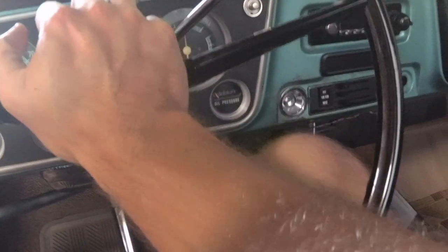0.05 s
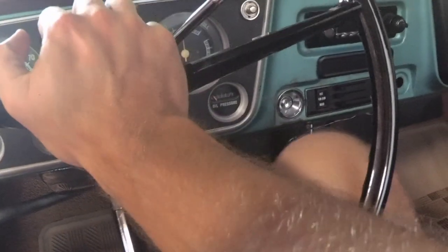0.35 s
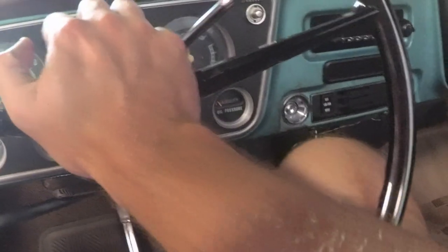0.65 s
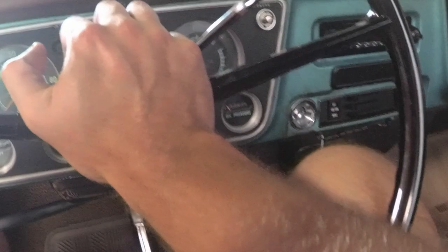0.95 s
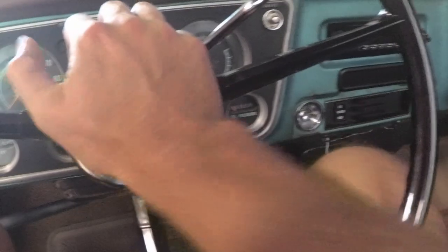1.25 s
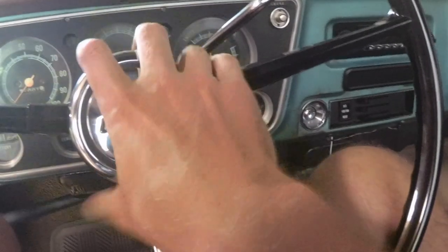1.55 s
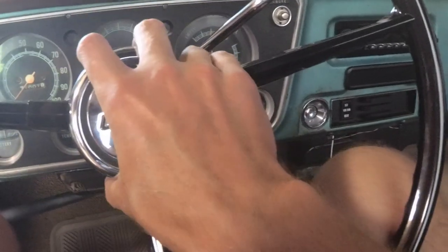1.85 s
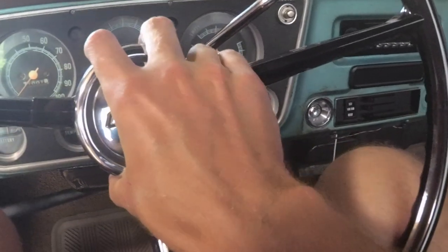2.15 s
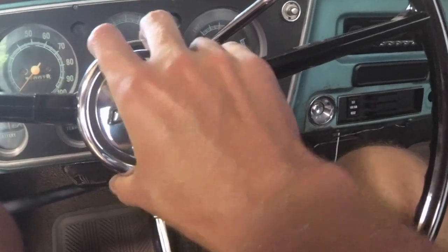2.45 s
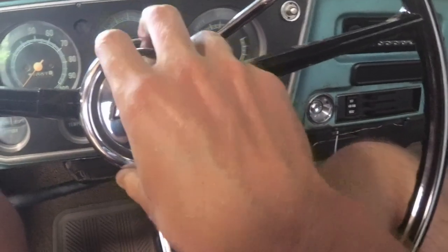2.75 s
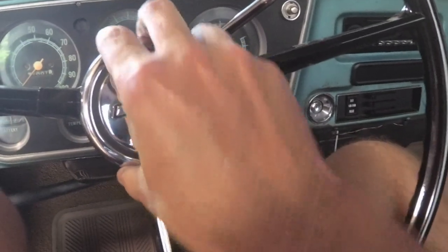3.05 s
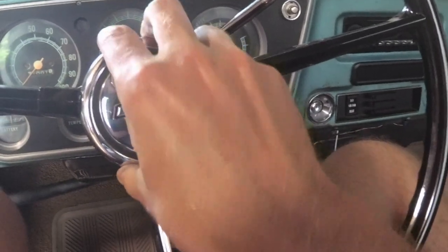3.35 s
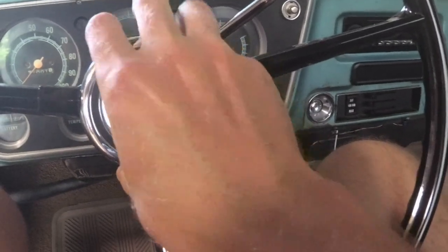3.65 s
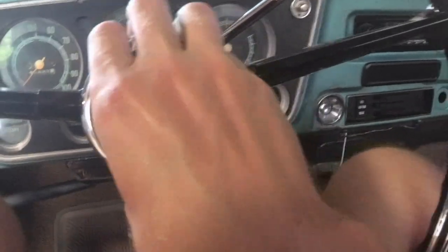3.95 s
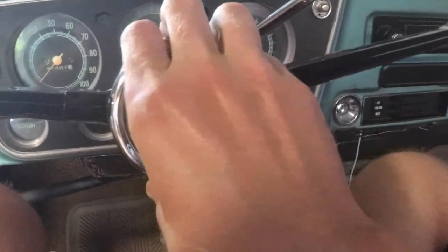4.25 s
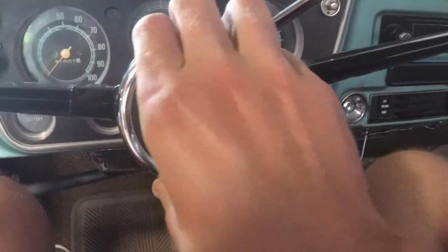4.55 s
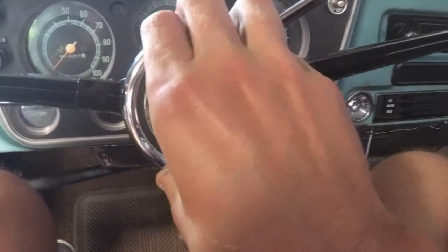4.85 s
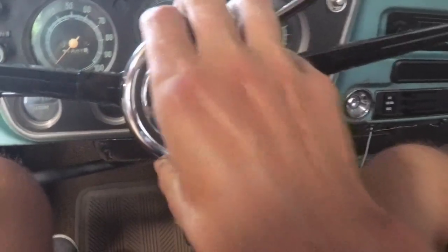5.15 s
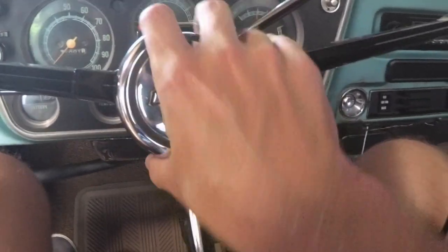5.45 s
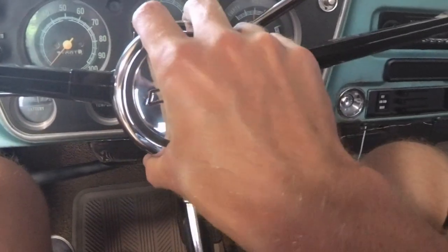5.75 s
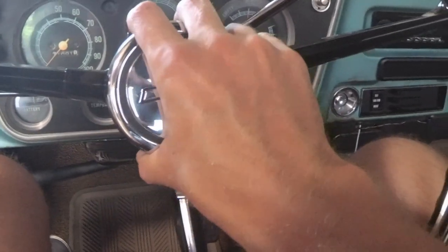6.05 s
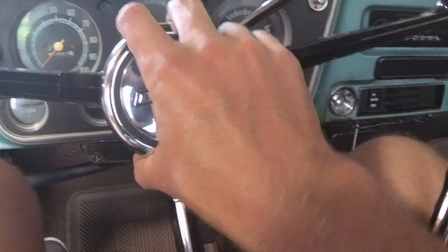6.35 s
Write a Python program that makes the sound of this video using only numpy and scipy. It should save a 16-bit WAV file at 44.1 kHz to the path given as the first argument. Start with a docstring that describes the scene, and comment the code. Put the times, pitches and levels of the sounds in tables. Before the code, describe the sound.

A loose metal horn button snaps, creaks and clicks under a hand, with two hard knocks and no horn sounding.

```python
"""In the quiet cab of an old truck, a hand works the loose chrome horn button of the steering wheel, close by.
The button snaps into its seat once, then creaks and ticks by stick-slip friction as it is pushed and twisted.
Its rim clacks against the cup, and light impacts set the chrome cap ringing in its natural modes.
Two hard knocks on the stop shake the steering column. The horn itself stays silent."""
import sys
import numpy as np
from scipy import signal
from scipy.fft import rfft, irfft, next_fast_len
from scipy.io import wavfile
from scipy.ndimage import uniform_filter1d

SR = 44100
rng = np.random.default_rng(int(sys.argv[2]) if len(sys.argv) > 2 else 0)


def master_out(mix):
    """Clip the mix to full scale and print it as 16-bit PCM to the path in sys.argv[1]."""
    frames = np.transpose(np.atleast_2d(mix))
    ceiling = np.clip(frames, -1, 1)
    pcm = np.round(ceiling * 32767).astype(np.int16)
    wavfile.write(sys.argv[1], SR, pcm)


N = 291942
TIME = np.arange(N) / SR
RING_SAMPLES = 24000  # length of one impact with its decay

# spectral envelope of the cup that holds the button: frequency_hz, gain_db
CUP_SPECTRUM = [(50, -49), (120, -23.5), (175, -0.5), (240, -15), (310, 6.5), (460, 0), (750, -3),
                (950, -6.5), (1600, -7.5), (2400, -11.5), (3600, -14.5), (8500, -32.5)]
# natural modes of the cup: frequency_hz, level_db, t60_s
CUP_MODES = [(327, 12.5, 0.071), (518, -16, 0.2), (615, 2.5, 0.33), (761, 9.5, 0.091)]


def undb(db):
    """Amplitude ratio of a level in decibels."""
    return 10 ** (np.asarray(db) / 20)


def unit(x):
    """Normalisation to an rms of 1."""
    return x / np.sqrt(np.mean(x ** 2))


def sized(x, db):
    """Equal energy: a transient gets the energy of 10 ms of steady sound at this level."""
    return unit(x) * undb(db) * np.sqrt(SR / 100 / x.shape[-1])


def add(out, start_s, x):
    """Superposition of a sound on the mix from start_s on."""
    start = max(int(start_s * SR), 0)
    out[:, start:start + x.shape[-1]] += x[..., :N - start]


def colour(x, points, tilt_db=0):
    """Minimum-phase filter through (frequency_hz, gain_db) points, tilted by tilt_db per octave."""
    size = 2 * next_fast_len(x.shape[-1] // 2 + 2048)
    octave = np.log2(np.fft.rfftfreq(size, 1 / SR) + 1)
    hz, db = np.transpose(points)
    held_octave = np.clip(octave, np.log2(hz[0]), np.log2(hz[-1]))
    gain = undb(np.interp(octave, np.log2(hz), db) + tilt_db * held_octave)
    cepstrum = irfft(np.log(gain))
    cepstrum[1:size // 2] *= 2  # folding onto positive time makes the filter causal
    cepstrum[size // 2 + 1:] = 0
    return irfft(rfft(x, size) * np.exp(rfft(cepstrum)))[..., :x.shape[-1]]


def diffuse(size, apart_hz=6500):
    """Diffuse field: noise coherent at the two ears in the bass, uncorrelated above apart_hz."""
    mid, side = rng.standard_normal((2, size))
    hz = np.fft.rfftfreq(size, 1 / SR)
    side = irfft(rfft(side) * np.minimum(hz / apart_hz, 1), size)
    return np.array([mid + side, mid - side])


def fade(t60):
    """Exponential decay by 60 dB in t60 seconds."""
    return np.exp(-np.log(1000) * np.arange(RING_SAMPLES) / SR / t60)


def ring(modes, scatter_db=1):
    """Free vibration: damped modes, excited unevenly; high ones reach the two ears out of phase."""
    out = np.zeros((2, RING_SAMPLES))
    for hz, db, t60 in modes:
        ear_phase = min(hz / 11000, 1) * rng.uniform(-0.75, 1) * np.array([[1], [-1]])
        t = np.arange(min(int(t60 * SR), RING_SAMPLES)) / SR
        envelope = undb(db + scatter_db * rng.standard_normal()) * np.exp(-np.log(1000) * t / t60)
        out[:, :len(t)] += envelope * np.sin(2 * np.pi * hz * t + ear_phase)
    return out


def favoured(modes, near_hz, focus_db):
    """Selective excitation: the striking point feeds modes less by focus_db per octave from near_hz."""
    return [(hz, db - focus_db * abs(np.log2(hz / near_hz)), t60) for hz, db, t60 in modes]


def blow(crack_t60, tail_t60, tail_db, push_db):
    """Broadband impact: contact chatter, the cab's reverberation and a single impulse of force."""
    crack = sized(diffuse(RING_SAMPLES) * fade(crack_t60), 0)
    tail = sized(diffuse(RING_SAMPLES) * fade(tail_t60), tail_db)
    return crack + tail + sized(signal.unit_impulse(RING_SAMPLES), push_db)


def background(pulse_hz=29.95):
    """Noise floor: steady hiss, faint hum and a thin, amplitude-modulated electronic whine."""
    # spectral envelope of the hiss: frequency_hz, gain_db
    hiss_spectrum = [(20, -7.5), (60, -11.5), (130, -7.5), (250, -9.5), (450, -7.5), (1400, -12),
                     (6300, -17), (8300, -14.5), (15000, -17)]
    # tones of the hum: frequency_hz, level_db
    hum_tones = [(99, -75), (167, -73.5)]
    hiss = unit(colour(diffuse(N, apart_hz=2206), hiss_spectrum)) * undb(-53)
    hum = sum(np.sqrt(2) * undb(db) * np.sin(2 * np.pi * hz * TIME) for hz, db in hum_tones)
    pulse = (.5 + .5 * np.cos(2 * np.pi * pulse_hz * TIME)) ** 2
    whine = colour(diffuse(N), [(9800, -50.5), (10500, -8), (11260, 4), (11600, -58)])
    return hiss + hum + unit(whine * pulse) * undb(-63.5)


def drags(peak_hz=510):
    """Sliding friction: the palm moving slowly round the wheel gives a soft, hollow rush."""
    # slides of the palm: start_s, end_s, level_db
    slides = [(2.197, 2.813, -56), (3.815, 4.41, -58), (5.597, 5.86, -53.5)]
    spectrum = [(peak_hz / 2, -22), (peak_hz, 0), (peak_hz * 1.21, -14),
                (peak_hz * 3, -15), (peak_hz * 10, -35)]
    rush = unit(colour(diffuse(N), spectrum))
    out = np.zeros((2, N))
    for start_s, end_s, db in slides:
        piece = rush[:, int(start_s * SR):int(end_s * SR)]
        add(out, start_s, piece * signal.windows.tukey(piece.shape[1], .5) * undb(db))
    return out


def skin(force):
    """Friction of skin on chrome: a hiss proportional to force, and short wavering squeaks."""
    # spectral envelope of the sliding palm: frequency_hz, gain_db
    palm_spectrum = [(300, -6), (1500, -0.5), (8000, -9.5)]
    # squeaks of the skin: start_s, level_db, pitch_hz, length_s
    squeaks = [(4.464, -49, 1118, 0.13), (5.471, -46.5, 519, 0.016), (5.698, -42, 540, 0.013)]
    out = unit(colour(diffuse(N), palm_spectrum)) * force
    for start_s, db, hz, length_s in squeaks:
        size = int(length_s * SR)
        waver = unit(uniform_filter1d(rng.standard_normal(size), size=60))
        phase = 2 * np.pi * np.cumsum(hz * (1 + 0.085 * waver)) / SR
        tone = np.sin(phase) + 0.06 * np.sin(2 * phase)
        add(out, start_s, unit(tone * signal.windows.tukey(size, .5)) * undb(db))
    return out


def rubbing(force, treble_force, grains_per_s=520, spread_db=5, treble_hz=2000):
    """Random stick-slip: dense, uneven grains excite the cup; treble_force sets their brightness."""
    sizes = undb(spread_db * np.minimum(rng.exponential(size=N), 3)) * np.sign(rng.standard_normal(N))
    grains = (rng.random(N) < grains_per_s / SR) * sizes
    # every grain scatters round the cab and dies away
    scattered_energy = np.abs(signal.fftconvolve(grains ** 2, fade(t60=0.075) ** 2)[:N])
    scatter = diffuse(N) * np.sqrt(scattered_energy)
    scrape = unit(colour(unit(grains) + 1.19 * unit(scatter), CUP_SPECTRUM))
    resonance = signal.fftconvolve(grains[None], ring(CUP_MODES), axes=1)[:, :N]
    body = scrape + undb(-11.5) * unit(resonance)
    dull = signal.sosfiltfilt(signal.butter(2, treble_hz, fs=SR, output="sos"), body)
    return dull * force + (body - dull) * treble_force


def efforts(strokes, attack_s=0.0024, release_s=0.037, start_db=-10.5, end_db=-10):
    """Force envelopes, one row a stroke: the hand takes hold, pushes to a peak, eases and lets go."""
    rows = []
    for start_s, build_s, length_s, *_ in strokes:
        age = TIME - start_s
        push = undb(np.interp(age, [0, min(build_s, length_s), length_s], [start_db, 0, end_db]))
        attack = np.clip(age / attack_s, 0, 1)
        release = np.exp(-np.clip(age - length_s, 0, 1) / release_s)
        rows.append(push * attack * release)
    return np.array(rows)


def hand():
    """Friction noise follows force: each stroke drives the rubbing and the palm's hiss together."""
    # strokes over the button: start_s, build_s, length_s, rub_db, treble_lift_db, palm_hiss_db
    strokes = [(0, 0.00079, 0.072, -28.5, -9, -31.5), (0.079, 0.1, 0.35, -52, 2, -44),
               (0.379, 0.016, 0.33, -47, -11, -52.5), (0.793, 0.092, 0.2, -41.5, 2.5, -53),
               (1.07, 0.18, 0.4, -36.5, -7.5, -47.5), (1.606, 0.041, 0.22, -45.5, 0.5, -69),
               (1.81, 0.14, 0.24, -50, 2, -74), (4.478, 0.22, 0.25, -35, -11.5, -43),
               (5.066, 0.2, 0.31, -48, 4.5, -61), (5.82, 0.018, 0.22, -42.5, 2.5, -68),
               (5.988, 0.02, 0.071, -41, 1, -62), (6.33, 0.015, 0.069, -47.5, 5.5, -50)]
    push = efforts(strokes)
    rub, lift, hiss = undb(np.array(strokes)[:, 3:].T)
    return rubbing(rub @ push, (rub * lift) @ push) + skin(hiss @ push)


def tick(hz, loss_db):
    """One slip excites the cup and a hollow contact note; a soft contact rises slowly, with less treble."""
    swell = 1 - fade(np.interp(loss_db, [12, 24], [.009, .024]))
    impact = blow(crack_t60=0.016, tail_t60=0.11, tail_db=-3, push_db=-12) * swell
    contact_spectrum = [(hz / 2, -8), (hz, 0), (max(hz * 1.9, 1500), 0), (4500, -loss_db)]
    knock = colour(colour(impact, CUP_SPECTRUM), contact_spectrum)
    note = ring([(hz, 0, .026)]) * swell
    return sized(knock, 0) + sized(note, -3) + sized(ring(CUP_MODES), -11)


def creaks(contact_hz=663, pitch_spread=0.098, jitter=0.05, spread_db=1.5, fade_db=-7):
    """Relaxation oscillation: the twisted button sticks and slips in nearly even, weakening trains."""
    # twists of the button: start_s, length_s, slip_gap_s, first_level_db
    twists = [(1.627, 0.13, 0.013, -43), (1.852, 0.18, 0.0194, -39.5), (5.824, 0.13, 0.013, -42.5)]
    out = np.zeros((2, N))
    for start_s, length_s, gap_s, db in twists:
        for age in np.arange(0, length_s, gap_s):
            late, size, pitch = rng.standard_normal(3)
            slip = tick(contact_hz * np.exp(pitch_spread * pitch), loss_db=8)
            slip_db = db + fade_db * age / length_s + spread_db * size
            add(out, start_s + age + jitter * gap_s * late, sized(slip, slip_db))
    return out


def slips():
    """Static friction gives way: the button jumps in its cup with single ticks."""
    # separate slips: start_s, level_db, contact_pitch_hz, treble_loss_db
    jumps = [(0.24, -31.5, 750, 15), (0.247, -38, 590, 12), (0.3716, -29, 605, 27), (0.632, -38.5, 540, 19),
             (0.812, -45.5, 550, -5), (0.855, -33.5, 564, 1), (0.885, -37, 1100, 4), (0.943, -34, 610, 2.5),
             (1.266, -36, 814, 25), (1.374, -34, 600, 19), (1.633, -37.5, 694, 19), (1.662, -37, 726, 13),
             (1.735, -42.5, 1260, 8), (1.82, -42, 890, 1), (1.869, -37.5, 640, 3), (1.929, -41, 715, 4),
             (2.001, -41.5, 516, -5), (2.077, -41, 710, 1), (2.112, -44.5, 650, 2), (2.293, -43.5, 990, 18),
             (3.821, -38, 667, 3), (4.55, -28, 2410, 9), (4.559, -29, 593, -2), (4.656, -25, 570, 3),
             (5.153, -44, 1450, 11), (5.194, -45, 1520, -1), (5.218, -38.5, 660, 13), (5.242, -39, 1000, 7),
             (5.684, -46.5, 625, -10), (5.866, -36, 690, 7), (5.905, -41.5, 595, 3), (5.947, -35.5, 850, 6),
             (6.046, -38, 1290, 2)]
    out = np.zeros((2, N))
    for start_s, db, hz, loss_db in jumps:
        add(out, start_s, sized(tick(hz, loss_db), db))
    return out


def clacks():
    """Damped impact: the rocking button's rim drops against the cup, and the hand stifles its ring."""
    # drops of the rim: start_s, level_db, favoured_pitch_hz, tilt_db_per_octave
    drops = [(1.112, -48, 4500, 3), (1.299, -43, 3900, 3.5), (2.385, -38, 1600, 0),
             (2.588, -46.5, 1300, -4), (3.76, -50.5, 2190, 5.5), (5.2864, -34.5, 1150, -5.5),
             (5.296, -41.5, 1100, -5.5), (5.339, -42.5, 1300, -9.5), (5.4878, -40, 2280, 2.5),
             (6.416, -48, 3500, 9)]
    # spectral envelope of the rim's contact: frequency_hz, gain_db
    rim_spectrum = [(300, -23), (1000, -6), (1430, 3), (2600, -13.5), (3500, -7), (4400, -11), (15000, -25)]
    # natural modes of the rim: frequency_hz, level_db, t60_s
    rim_modes = [(1127, 4, 0.041), (1417, 2.5, .09), (2150, -1.5, 0.1), (3494, -2, 0.14)]
    out = np.zeros((2, N))
    for start_s, db, near_hz, tilt_db in drops:
        impact = blow(crack_t60=0.016, tail_t60=0.1, tail_db=-2, push_db=-20)
        crack = colour(impact, rim_spectrum, tilt_db)
        ringing = ring(favoured(rim_modes, near_hz, focus_db=2.5))
        add(out, start_s, sized(crack, db) + sized(ringing, db - 4.5))
    return out


def cap(split_hz=21, build_s=0.047):
    """Mode splitting: the clicked chrome cap is not quite round, so it rings in close, beating pairs."""
    # touches of metal on the cap: start_s, click_db, ring_db, favoured_pitch_hz, t60_factor
    touches = [(1.366, -46, -52, 4930, 2.2), (2.566, -40, -60, 4910, .6), (2.577, -44, -40.5, 2900, 1),
               (3.746, -47, -50.5, 4900, .45), (3.812, -45, -56, 4900, .3), (5.135, -43.5, -63, 4900, .5),
               (5.274, -45, -44, 4930, 1.2), (5.3, -42, -42.5, 7000, .7), (5.331, -39, -37.5, 13000, 1),
               (5.343, -40, -41.5, 3100, .8)]
    # spectral envelope of a click: frequency_hz, gain_db
    click_spectrum = [(600, -1), (4500, -5)]
    # natural modes of the cap: frequency_hz, level_db, base_t60_s
    cap_modes = [(1497, -2, 0.5), (2958, -3, 0.36), (3203, 0, 0.22), (4905, -3, 0.27), (6804, -10, 0.38),
                 (8726, -5, 0.14), (10490, -4, 0.17), (11880, -4, 0.16), (13170, -3, 0.2),
                 (15080, -5, 0.12)]
    # a light touch excites only the nearest mode, a hard one all: ring_db, loss_db_per_octave
    selectivity = [(-46, 28), (-43, 3)]
    swell = 1 - fade(build_s)  # the cap chatters against its seat while its ring builds up
    out = np.zeros((2, N))
    for start_s, click_db, ring_db, near_hz, freedom in touches:
        click = colour(blow(crack_t60=0.02, tail_t60=0.14, tail_db=2, push_db=-20), click_spectrum)
        focus_db = np.interp(ring_db, *np.transpose(selectivity))
        # the freer the hand leaves the cap, the longer it rings
        modes = [(hz, db, t60 * freedom) for hz, db, t60 in favoured(cap_modes, near_hz, focus_db)]
        twins = [(hz + split_hz * rng.standard_normal(), db, t60) for hz, db, t60 in modes]
        ringing = (ring(modes) + .5 * ring(twins)) * swell
        add(out, start_s, sized(click, click_db) + sized(ringing, ring_db))
    return out


def column():
    """Structure-borne sound: steering column and dashboard take up a shove slowly and boom on."""
    # shoves that reach the column: start_s, level_db, bass_tilt_db_per_octave
    shoves = [(0.012, -33, 1), (0.386, -40, -8.5), (0.439, -40, -5), (1.231, -44, 19), (4.547, -22, 0.5),
              (4.664, -20.5, 2), (6.006, -37, -1), (6.342, -31.5, -3.5)]
    # natural modes of the column: frequency_hz, level_db, t60_s
    column_modes = [(34.1, -10.5, 0.89), (134, -9, 0.39), (191.6, 5, 0.19), (330, -6, 0.34),
                    (404.4, -9.5, 0.31), (568, -14.5, 0.38), (811, -9.5, 0.16)]
    # spectral envelope of the panels: frequency_hz, gain_db
    panel_spectrum = [(25, -9.5), (65, 1.5), (165, 8.5), (260, -2.5), (600, -10), (1000, -13.5),
                      (2500, -46)]
    bass_span = [(30, 0.032), (220, 0.0056)]  # nearly flat; the tilt acts between these points
    swell = 1 - fade(0.019)
    out = np.zeros((2, N))
    for start_s, db, tilt_db in shoves:
        panels = colour(diffuse(RING_SAMPLES) * fade(0.64) * swell, panel_spectrum)
        boom = sized(ring(column_modes) * swell, 0) + sized(panels, -1.5)
        add(out, start_s, sized(colour(boom, bass_span, tilt_db), db))
    return out


def knocks(contact_delay_s=0.00187):
    """Hard impact: the button bottoms out with a crack; spring, metal stop and contact ring briefly."""
    # hits on the stop: start_s, crack_db, contact_pitch_hz, contact_db, spring_db
    hits = [(4.541, -22.5, 1340, -33.5, -48), (4.6518, -20.5, 1705, -30, -29)]
    # spectral envelope of the crack before its tilt: frequency_hz, gain_db
    crack_spectrum = [(150, -19), (250, -3), (788, -11), (1230, -17), (1700, -3.5), (2060, -37),
                      (2800, -19), (5370, -9), (5850, -18), (9450, -14.5), (15000, -18)]
    # natural modes of the spring behind the button: frequency_hz, level_db, t60_s
    spring_modes = [(9680, 8, 0.13), (9700, -2, 0.11)]
    # natural modes of the stop: frequency_hz, level_db, t60_s
    stop_modes = [(1390, 3, 0.11), (1720, -19, 0.091), (1900, -3.5, 0.15)]
    out = np.zeros((2, N))
    for start_s, crack_db, hz, contact_db, spring_db in hits:
        impact = blow(crack_t60=.026, tail_t60=.14, tail_db=0, push_db=-12)
        crack = sized(colour(impact, crack_spectrum, tilt_db=1.5), crack_db)
        add(out, start_s, crack + sized(ring(spring_modes), spring_db) + sized(ring(stop_modes), -30.5))
        add(out, start_s + contact_delay_s, sized(ring([(hz, 0, .045)]), contact_db))
    return out


def snaps():
    """Impulsive excitation: the button jumps home with a sharp double crack that sets its seat ringing."""
    # the two contacts of the snap: start_s, level_db
    contacts = [(0.0066, -10.5), (0.0084, -11)]
    # spectral envelope of the crack: frequency_hz, gain_db
    crack_spectrum = [(71, -46), (120, -18), (460, 6), (905, -16.5), (1450, -3), (2700, -4.5), (3300, -5.5),
                      (4460, 3.5), (5600, -3), (6420, -1.5), (9050, -11.5), (11500, -12), (15000, -21)]
    # natural modes of the seat: frequency_hz, level_db, t60_s
    seat_modes = [(341.7, -4, 0.22), (800, 9, 0.048), (2139, -7, 0.1), (3570, 7, 0.082), (4340, 4, 0.071)]
    out = np.zeros((2, N))
    for start_s, db in contacts:
        crack = colour(blow(crack_t60=0.03, tail_t60=0.13, tail_db=4, push_db=5), crack_spectrum)
        add(out, start_s, sized(crack, db) + sized(ring(seat_modes), db - 6))
    return out


def scene():
    """Linear superposition: all sources add, centred on the hub of the wheel straight ahead."""
    button = snaps() + knocks() + column() + slips() + creaks()
    return button + drags() + clacks() + cap() + background() + hand()


def record(dry):
    """Saturation and band limiting: the microphone clips at full scale and cuts the top of the treble."""
    lowpass = signal.ellip(10, .2, 70, 15300, fs=SR, output="sos")
    return signal.sosfilt(lowpass, np.clip(dry, -1, 1))


dry = scene()
out = record(dry)
master_out(out)
```